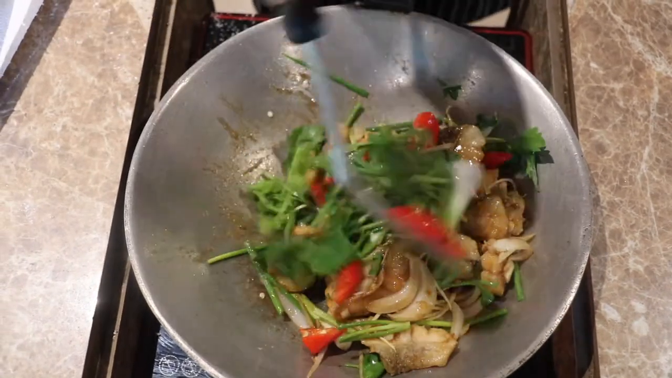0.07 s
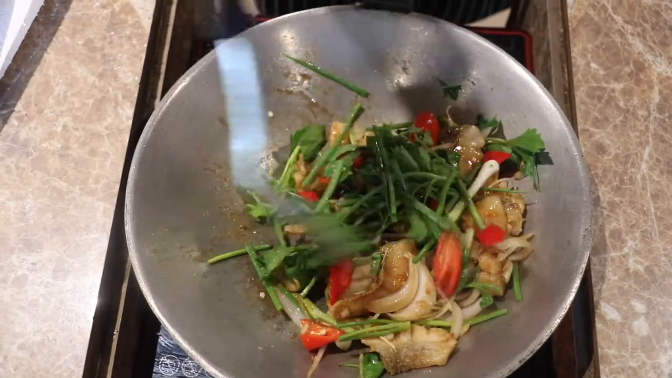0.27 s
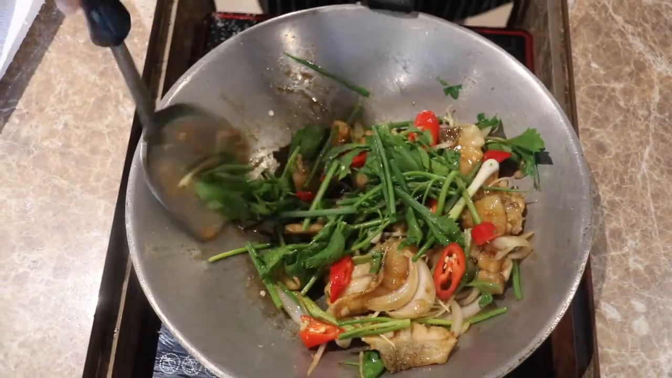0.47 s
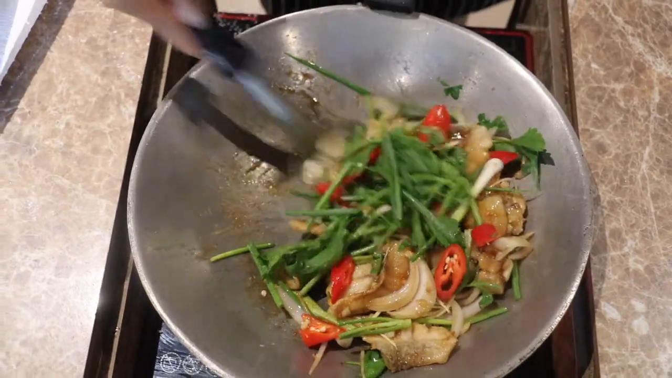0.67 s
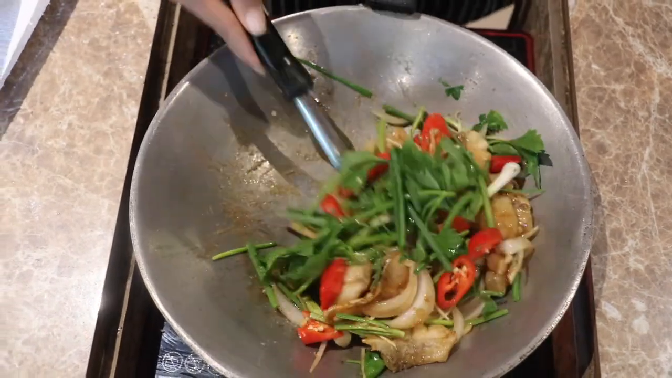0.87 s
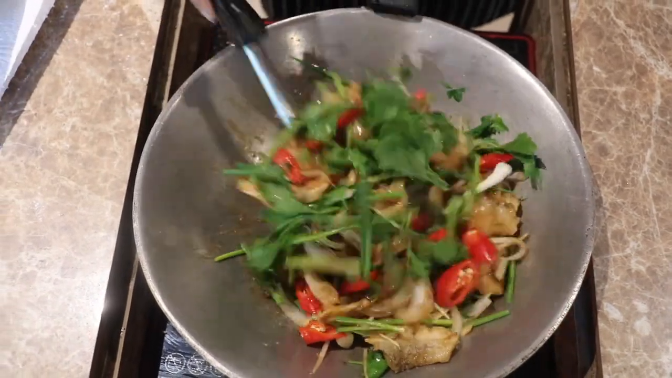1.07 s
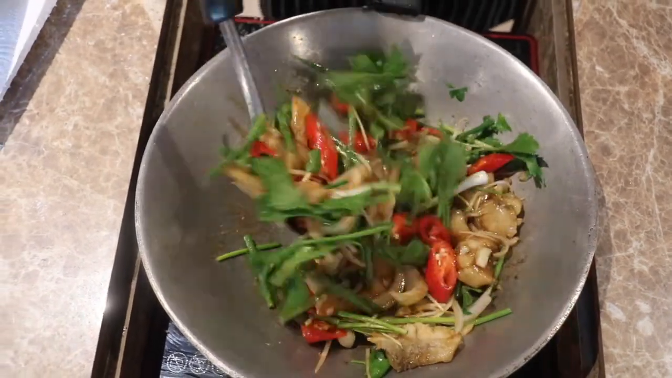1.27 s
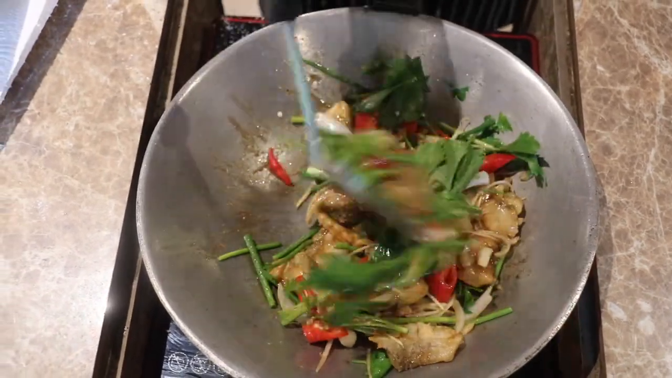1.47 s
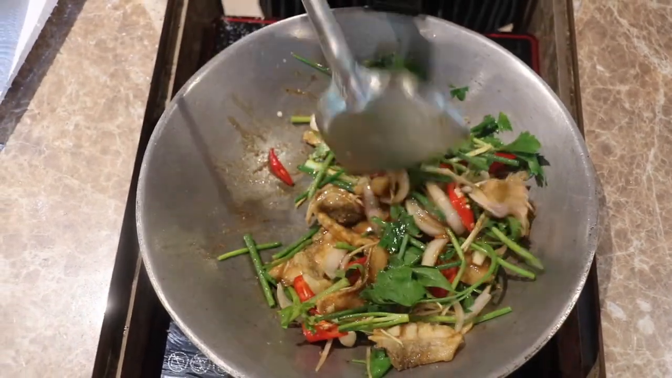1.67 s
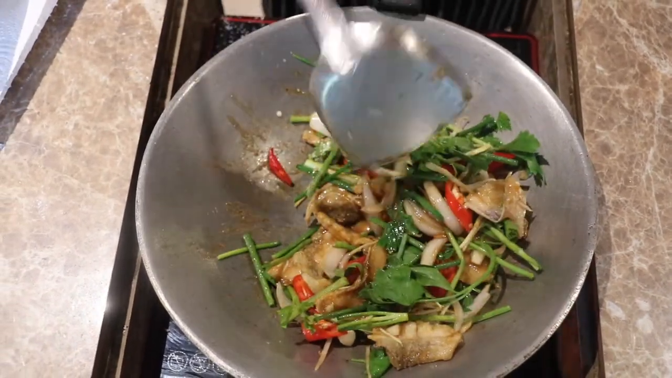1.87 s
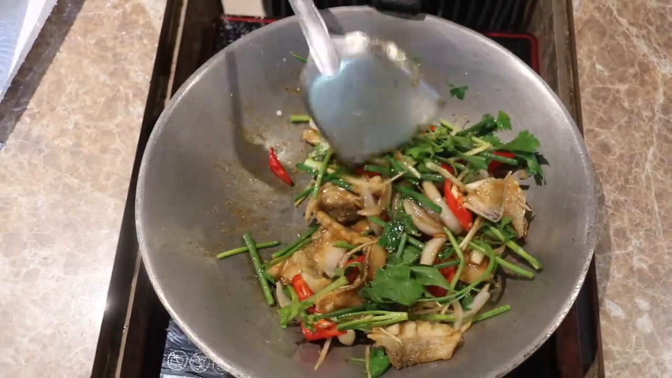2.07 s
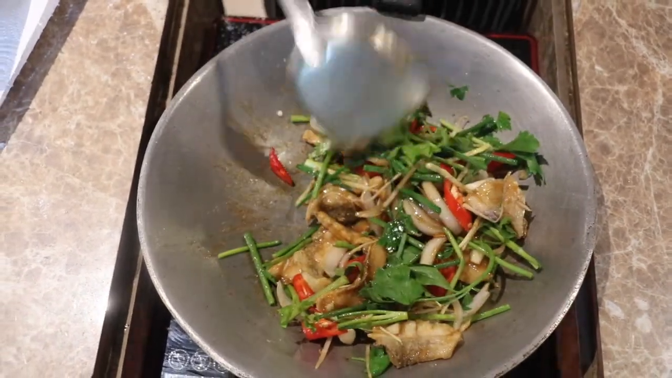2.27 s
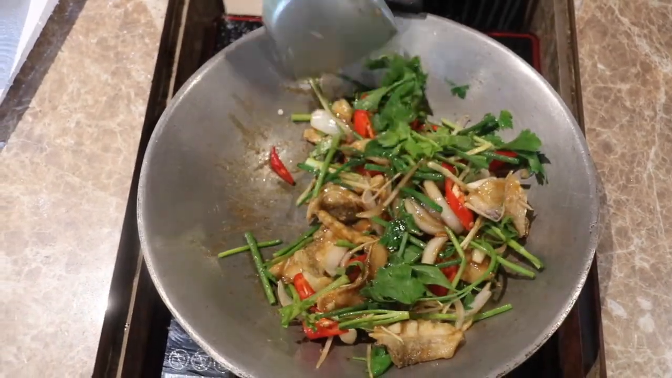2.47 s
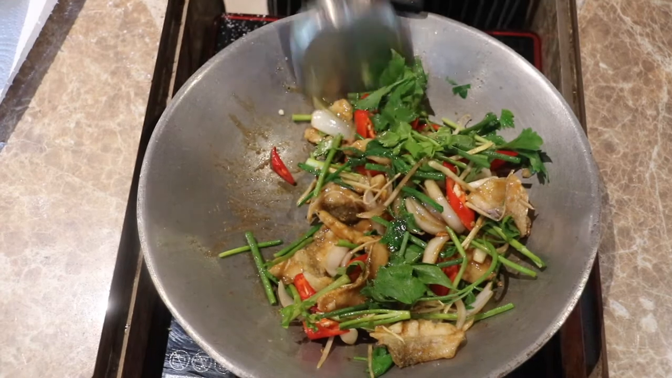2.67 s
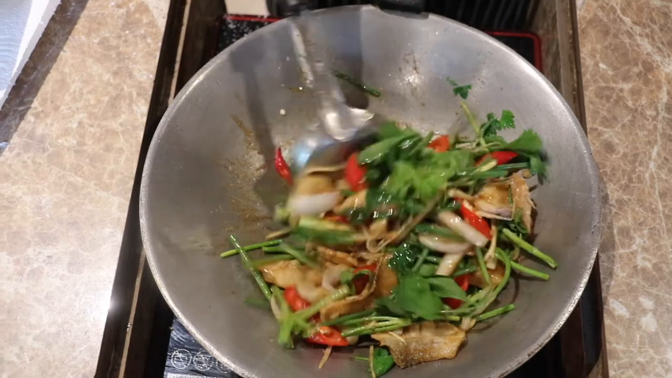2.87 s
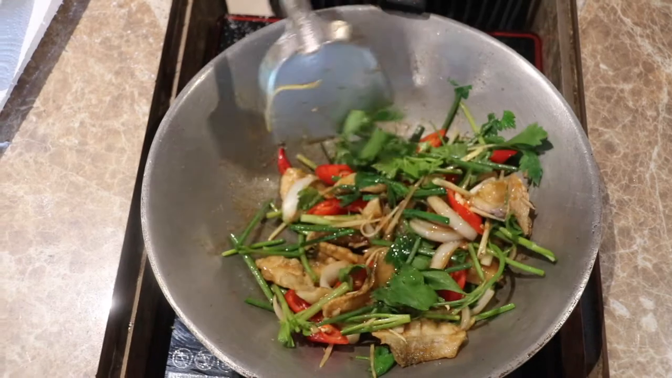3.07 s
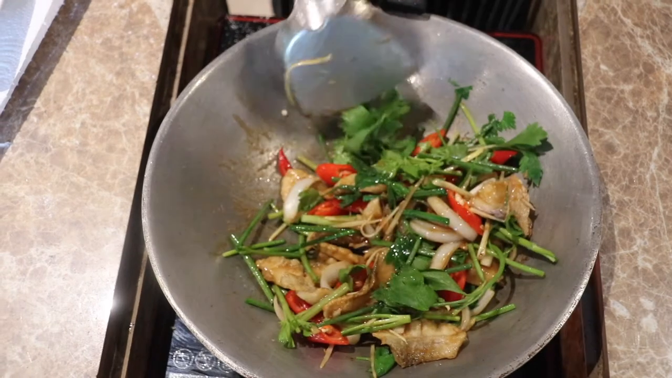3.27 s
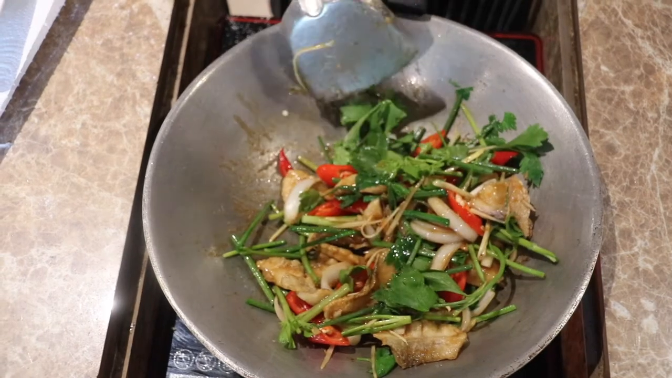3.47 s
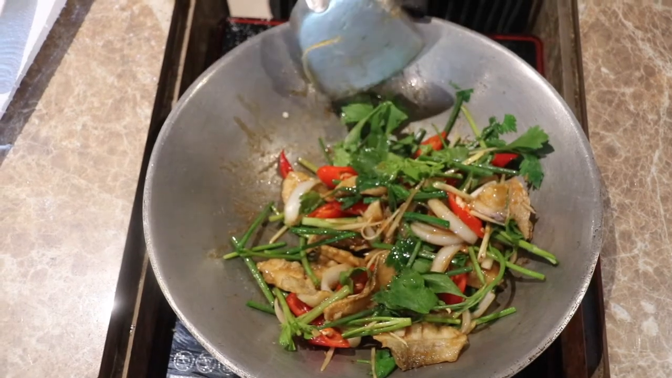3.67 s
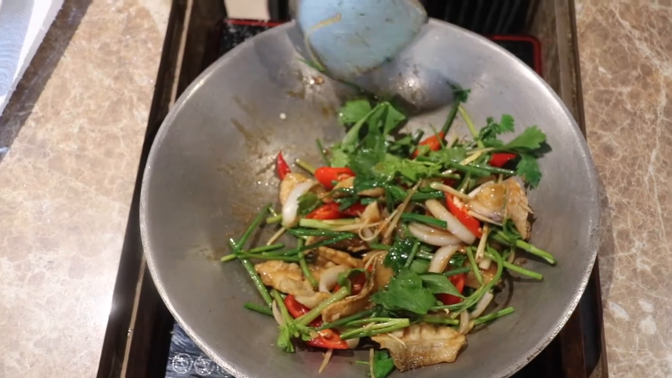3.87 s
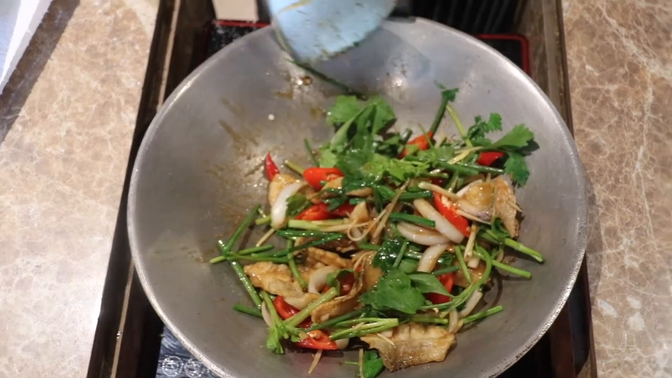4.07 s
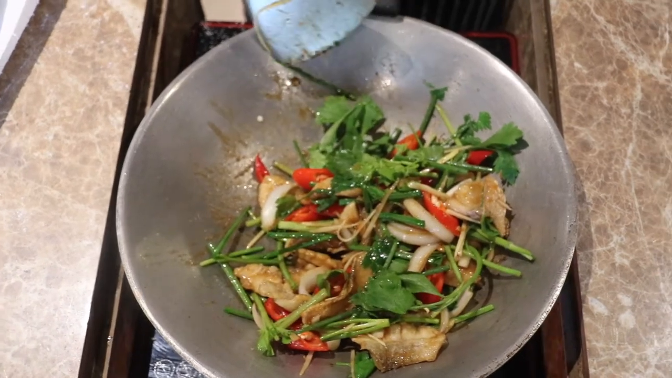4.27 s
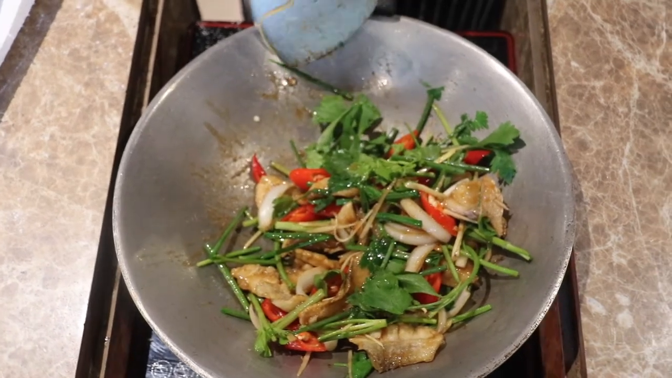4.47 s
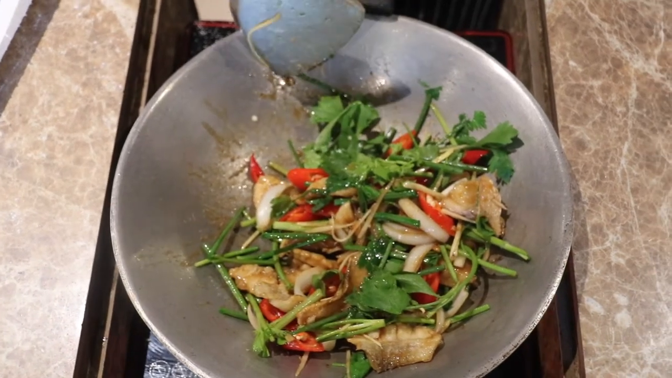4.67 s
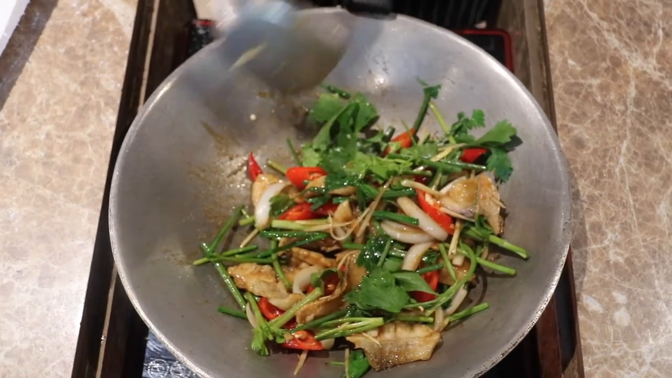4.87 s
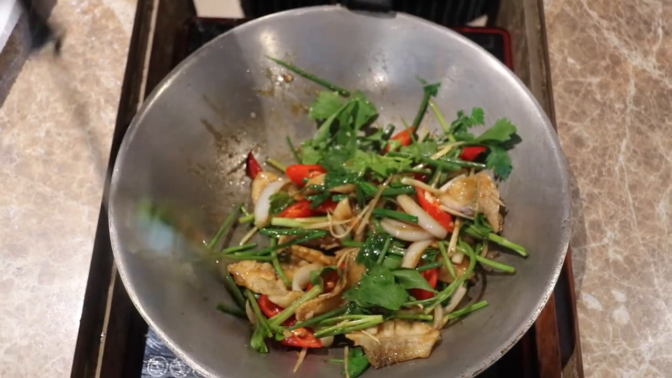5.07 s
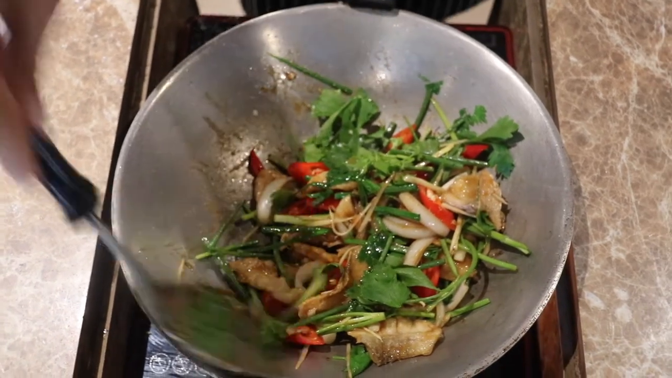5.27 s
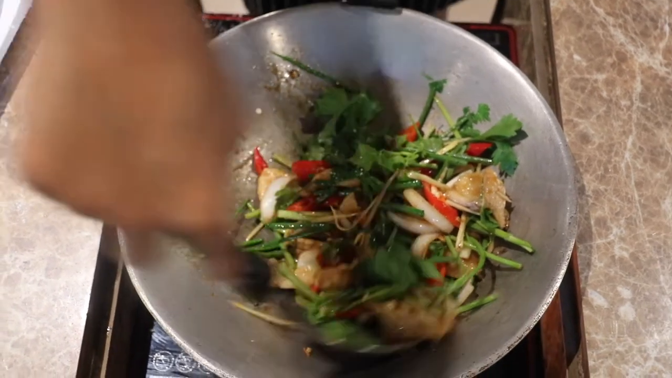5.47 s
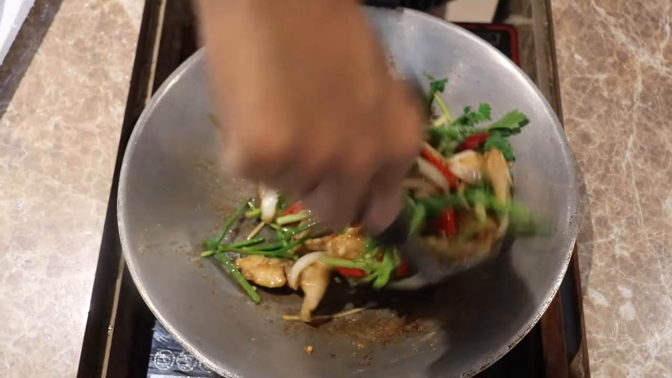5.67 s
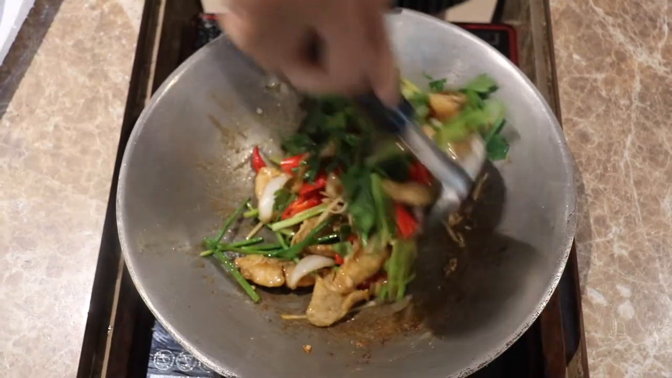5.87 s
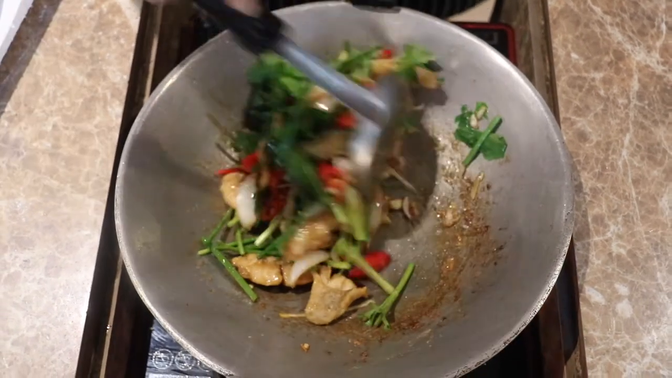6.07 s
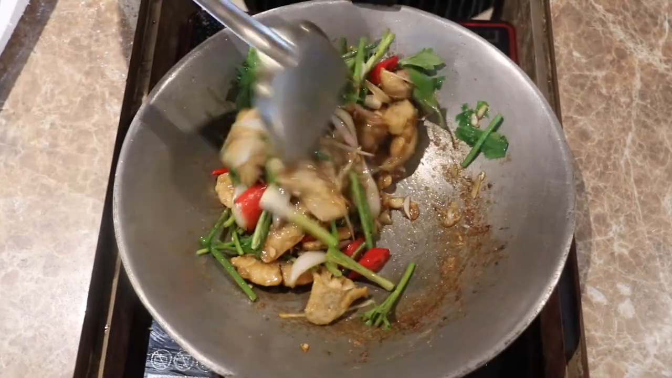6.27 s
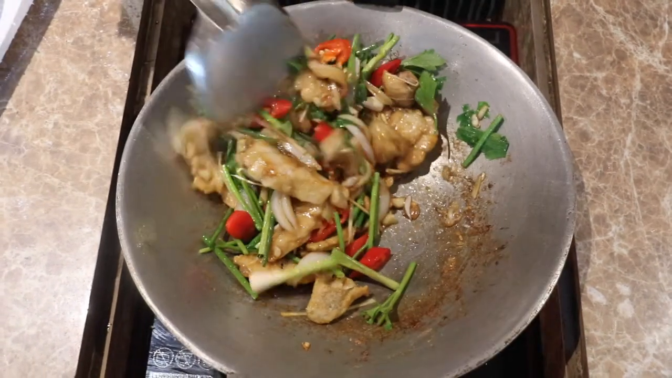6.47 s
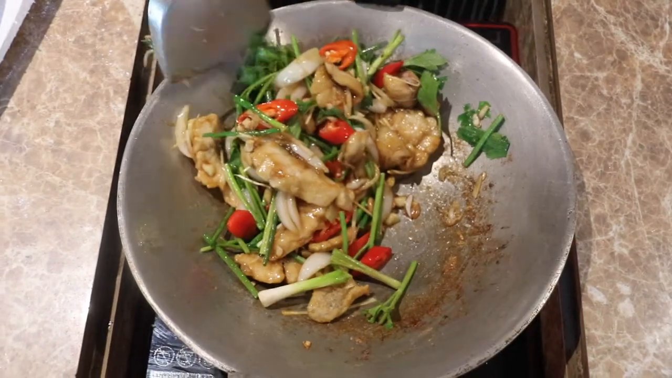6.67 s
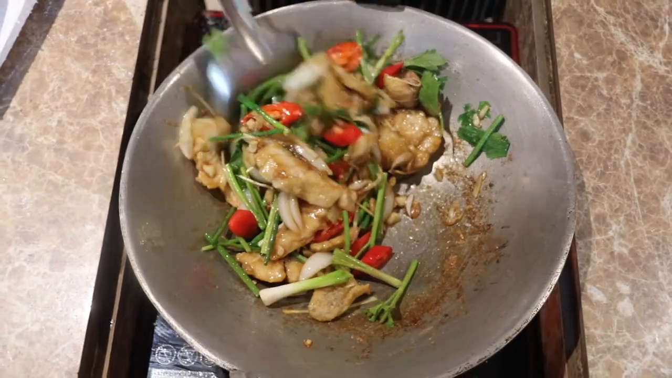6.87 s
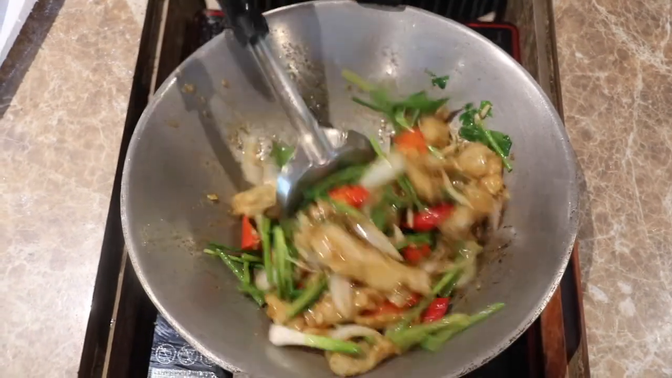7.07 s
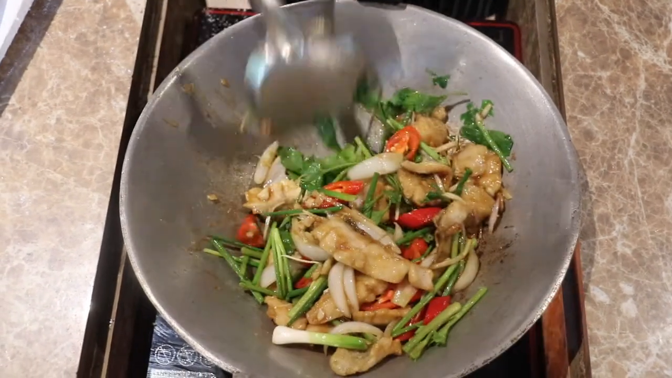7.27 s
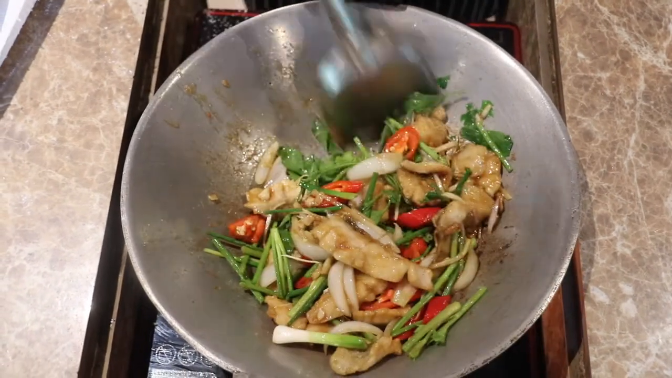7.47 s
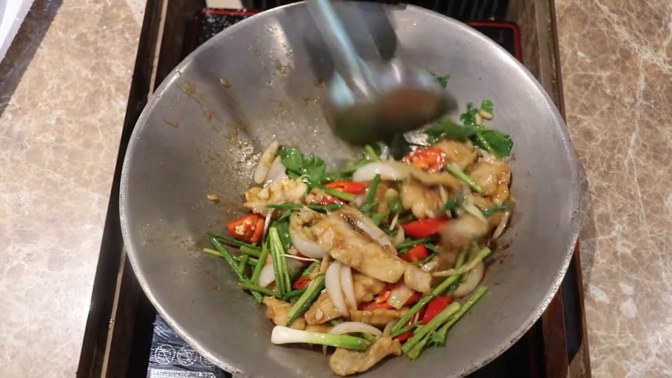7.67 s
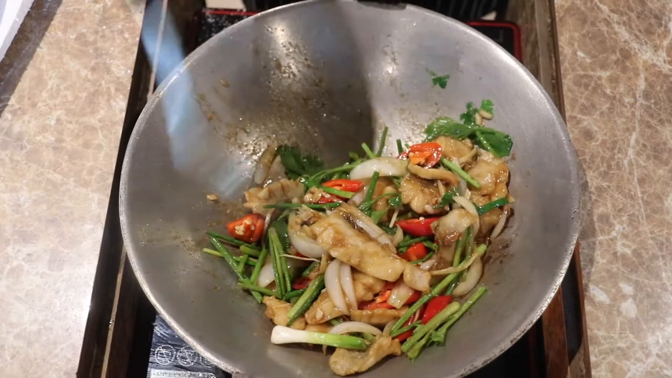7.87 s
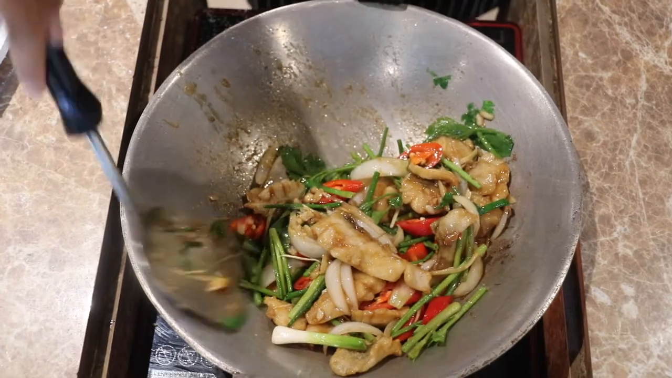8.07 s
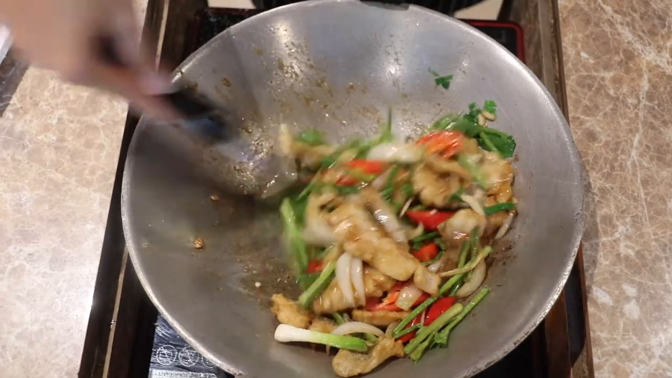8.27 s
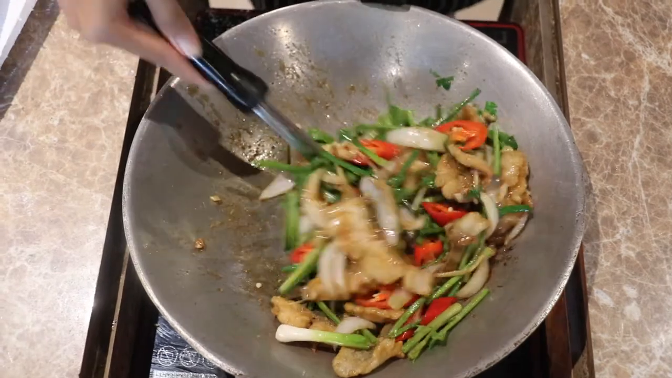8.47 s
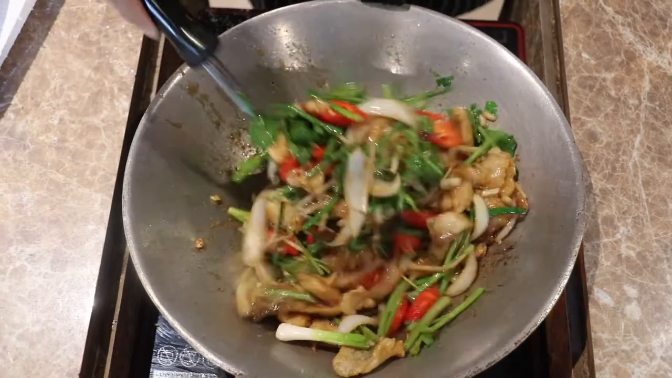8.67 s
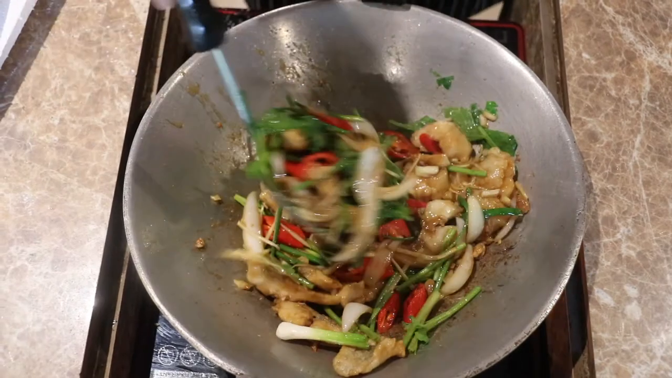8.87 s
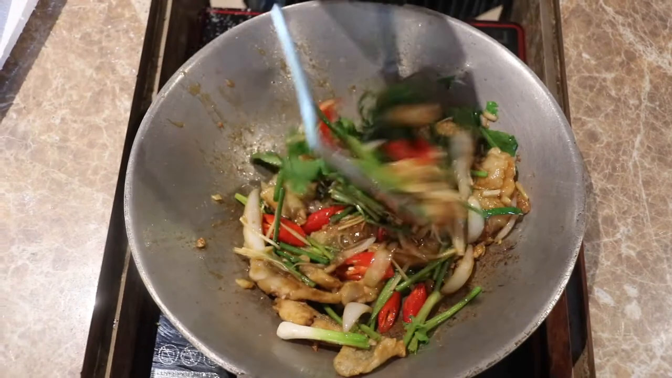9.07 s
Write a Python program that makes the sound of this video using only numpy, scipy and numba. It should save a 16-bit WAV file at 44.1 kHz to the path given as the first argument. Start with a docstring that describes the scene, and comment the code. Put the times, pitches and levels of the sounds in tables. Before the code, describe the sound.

Food sizzles steadily in a steel wok while a metal spatula knocks and scrapes against it, over a low fan hum.

```python
"""Stir-frying in a steel wok.

Steam bubbles burst in four size classes whose pitch shifts as food, spatula and hand move about.
The spatula knocks and scrapes the food-damped bowl; the bowl thuds on its stand.
Behind them a fan hums and the oil hisses. Heard through a phone's single microphone."""
import sys
import numpy as np
from scipy import signal
from scipy.io import wavfile
from scipy.ndimage import uniform_filter1d
from numba import njit

SR = 44100
rng = np.random.default_rng(int(sys.argv[2]) if len(sys.argv) > 2 else 0)


def store_pcm(level_fs):
    """Save levels as 16-bit WAV."""
    pcm = np.round(np.clip(level_fs, -1, 1) * 32767).astype(np.int16)
    wavfile.write(sys.argv[1], SR, np.atleast_2d(pcm).T)


N = 401751

# fan and oil noise spectrum: freq_hz, relative_density_db
NOISE_SPECTRUM = [(40, -33), (70, -20.5), (110, -16.5), (170, -10), (260, -7.5), (400, -7.5), (600, -2.5),
                  (900, -5.5), (1300, -6.5), (2700, -4.5), (6000, -8.5), (10000, -23.5)]
# fan tones: pitch_hz, level_db, width_hz
FAN_TONES = [(75, -75.5, 5), (100.4, -68.5, 4), (451.8, -53.5, 4.8)]
# fan swell, taken about its mean: time_s, level_db
FAN_SWELL = [(0.0, -55), (0.63, -53.5), (1.01, -56.5), (1.52, -48.5), (1.93, -50.5), (2.89, -44),
             (3.2, -51), (3.48, -52.5), (4.31, -45), (5.4, -50.5), (6.04, -56.5), (6.65, -49.5),
             (7.08, -38.5), (7.31, -51), (8.25, -47), (8.57, -55), (9.11, -56)]
# oil hiss swell: time_s, gain_db
OIL_SWELL = [(0, -1.5), (.66, -2), (.695, -3), (.85, 1), (1.3, -0.5), (4.5, 4), (5.7, -2), (7.3, 3.5),
             (9.11, -2)]

# steady boil, one table per bubble size: time_s, level_db, pitch_hz
LARGE_BOIL = [(0, -35.5, 1666), (.55, -39, 1536), (1.1, -36, 1904), (1.24, -37, 1540), (1.4, -33, 1660),
              (1.72, -34.5, 1682), (1.95, -41, 1404), (2.6, -39.5, 1480), (3.25, -47.5, 1464),
              (4.23, -40, 1670), (5.2, -43, 1453), (6.14, -38, 1586), (6.5, -42.5, 1440), (7.36, -36, 1624),
              (7.55, -44.5, 1480), (7.86, -37, 1528), (8.6, -35.5, 1697), (8.68, -40.5, 1490),
              (9.11, -42, 1584)]
MEDIUM_BOIL = [(0, -35.5, 3780), (.6, -36.5, 3880), (.8, -45, 4110), (1.06, -45, 4010), (1.3, -38, 4120),
               (2.0, -36, 3575), (2.74, -31, 3130), (2.86, -35, 3550), (3.3, -34.5, 3397),
               (4.85, -35, 3108), (5.0, -37, 3120), (5.28, -35.5, 4020), (5.6, -44, 4010),
               (5.84, -44, 4100), (6.22, -37.5, 3750), (6.65, -34, 3275), (6.9, -31.5, 2930),
               (7.14, -30, 3860), (7.3, -40.5, 4000), (7.81, -40, 3820), (8.8, -42, 4090),
               (9.11, -38, 4010)]
SMALL_BOIL = [(0, -36.5, 5060), (.6, -39, 4960), (.78, -37, 4750), (.95, -38, 6000), (1.19, -37, 5750),
              (1.44, -32, 4870), (1.75, -38, 4920), (1.93, -44, 4520), (2.75, -42, 6000), (2.9, -52, 4630),
              (3.55, -56, 5430), (4.23, -42, 5210), (5.2, -51, 4820), (5.48, -38.5, 4860),
              (6.11, -39, 4880), (6.5, -64, 5580), (6.8, -42, 5770), (7.1, -43.5, 4710), (7.33, -32, 5250),
              (7.5, -47, 5000), (8.0, -41, 4760), (8.3, -44.5, 4970), (9.11, -44, 4740)]
TINY_BOIL = [(0, -44.5, 8440), (.25, -53, 9060), (.66, -41, 7750), (.76, -61, 7900), (1.13, -61, 7640),
             (1.2, -44, 9500), (1.49, -45.5, 9370), (1.93, -55, 7630), (2.28, -47, 7920),
             (2.74, -47.5, 8200), (2.85, -58.5, 7680), (4.57, -49, 7230), (4.94, -63, 7830),
             (5.6, -52, 7200), (5.79, -66.5, 7200), (6.54, -57, 7330), (7.05, -49.5, 7530),
             (7.26, -51, 8780), (7.43, -37, 7650), (7.68, -49.5, 8340), (7.86, -41.5, 9300),
             (7.96, -38.5, 7900), (8.17, -41, 8220), (8.32, -48, 7600), (8.57, -47, 7500),
             (8.78, -55.5, 8460), (9.11, -51, 8500)]
# borders between sizzle bands, one band per bubble size: pitch_hz
BAND_BORDERS_HZ = [2250, 4290, 6700]
# longer-ringing bubbles, large to tiny: gain_db, log_pitch_spread, decay_cycles
SINGING_BUBBLES = [(-9, .14, 6), (-9, .14, 10), (-5, .06, 15), (-3, .04, 21)]
# brief swells in one sizzle band, frying flare-ups and the noisy rattle of spatula knocks:
# peak_s, level_db, pitch_hz, fade_s
SIZZLE_SWELLS = [(.07, -39, 8930, .05), (.35, -40, 8930, .1), (.46, -36.5, 7900, 0.053),
                 (.56, -35, 7490, .08), (.58, -35, 3800, 0.11), (.66, -35, 4820, 0.074),
                 (.69, -33, 1420, .06), (1.01, -30.5, 2054, .1), (1.17, -32, 6070, .04),
                 (1.29, -40, 9340, .08), (2.81, -35, 1310, .08), (3.019, -32.5, 4010, 0.089),
                 (3.039, -33.5, 1507, 0.17), (3.07, -35, 4950, 0.08), (3.14, -34, 3830, 0.057),
                 (5.35, -33.5, 1150, 0.044), (5.51, -29.5, 1177, .07), (5.66, -31, 1887, 0.19),
                 (5.81, -34.5, 5770, 0.086), (5.94, -39.5, 8900, .08), (6.04, -41.5, 8270, 0.077),
                 (6.93, -32, 1144, 0.033), (7.13, -23.5, 1340, 0.079), (7.15, -36, 8400, 0.056),
                 (7.2, -22.5, 3850, 0.029), (7.2, -21.5, 5080, 0.041), (7.31, -40.5, 9230, 0.063),
                 (7.5, -32.5, 3435, 0.35), (7.61, -36, 4470, .05), (7.74, -31.5, 1255, .08),
                 (7.74, -30, 5340, 0.16), (8.12, -33.5, 4090, 0.27), (8.2, -35, 5360, .1),
                 (8.35, -36.5, 3920, 0.17), (8.42, -33, 1394, .1), (8.6, -35, 5230, .08),
                 (8.7, -37.5, 4800, .06), (8.91, -36.5, 3740, .15)]
# sizzle loudness ducks abruptly and recovers: start_s, depth_db, recovery_s
SIZZLE_DUCKS = [(.688, 8.5, 0.081), (2.775, 4.5, 0.032), (5.38, 0.5, 0.033), (6.945, 11, .04),
                (7.27, 2.5, 0.031)]
# band partly cancelled by the bowl's echo: centre_hz, width_hz, depth_ratio
BOWL_NOTCH = (2210, 103, 0.37)
# echoes off passing blade and hand: start_s, length_s, centre_hz, width_hz, depth_ratio
PASSING_NOTCHES = [(.8, .5, 3300, 1200, .3), (5.25, .8, 3150, 700, .5), (6.2, .8, 5300, 800, .45),
                   (6.3, 1.8, 2200, 250, .4), (7.35, .33, 5600, 600, .6), (7.62, .25, 7400, 1200, .5)]

# blade on bowl: start_s, main_db, upper_db, upper_centre_hz, contact_ms, t60_ratio
BLADE_KNOCKS = [(0.671, -27, -22, 1280, 1.5, 0.74), (0.721, -33, -38, 1340, 1.5, 0.9),
                (0.86, -13.5, -19.5, 930, 2.5, 0.38), (0.889, -43, -28.5, 905, 1.7, 0.97),
                (1.296, -25, -30, 1710, 1.1, 0.41), (2.15, -23, -37, 1630, 1.5, 0.58),
                (2.766, -31, -25, 991, 1.5, 0.97), (2.792, -23, -24, 1010, 1.3, 0.57),
                (2.809, -27, -22, 996, 1.4, 0.71), (2.839, -27, -26, 1160, 1.5, 1),
                (2.863, -23, -35, 1280, 1.2, 0.75), (3.035, -11.5, -18.5, 923, 0.83, 0.65),
                (5.345, -13.5, -15.5, 996, 1.9, 1), (5.357, -14, -20, 1040, 3.7, 1),
                (5.465, -50, -11, 1110, 2.4, 0.63), (5.497, -31, -13, 1130, 3.6, 0.9),
                (5.977, -28, -40, 894, 1.5, 0.68), (5.999, -36, -35, 1730, 1.5, 0.54),
                (6.9166, -14, -7, 973, 1.1, 0.99), (6.924, -10.5, -11, 980, 0.46, 0.48),
                (7.012, -26, -26, 1290, 1, 0.58), (7.24, -26, -28, 958, 1.5, 1),
                (7.283, -14.5, -30, 923, 1.9, 0.33), (7.737, -37, -16.5, 1355, 1.5, 0.73),
                (7.748, -8, -15, 950, 1.6, 0.46), (7.789, -20, -26, 880, 1.4, 0.54),
                (8.121, -24, -28, 1140, 2.3, 0.49), (8.256, -17.5, -34, 1360, 1, 0.52),
                (8.384, -8.5, -8.5, 900, 1.7, 0.3)]
# bowl modes, main and upper: pitch_hz, gain_db, t60_s
BOWL_MAIN_MODES = [(764.7, 8, .16), (725, -14, .1), (809, -0.5, 0.17)]
BOWL_UPPER_MODES = [(891, 3.5, .1), (996, 3, 0.088), (1098, 6.5, 0.036), (1286, -5.5, 0.048),
                    (1710, 12, 0.06)]
# bowl rocking on its stand: start_s, level_db, contact_ms
STAND_THUDS = [(0.651, -20, 4.1), (0.669, -31, 2.5), (0.689, -31.5, 2.2), (0.739, -38, 2.9),
               (0.869, -29, 0.6), (2.791, -30, 3.3), (2.819, -31, 2.9), (3.039, -34, 2), (4.311, -33, 2),
               (4.984, -38, 1.3), (5.339, -16.5, 2.4), (5.982, -39.5, 2.6), (6.475, -45, 2),
               (6.864, -34, 1.3), (6.917, -13.5, 3.2), (6.934, -21, 2), (6.954, -23, 2), (7.02, -26, 2),
               (7.049, -30, 1.5), (7.094, -35, 2), (7.123, -34, 2), (7.165, -27, 2), (7.254, -35, 3.6),
               (7.285, -40, 2), (7.623, -24.5, 2), (7.736, -17.5, 2), (8.192, -22.5, 2),
               (8.392, -26.5, 4.5)]
# modes of the bowl on its stand: pitch_hz, gain_db, t60_s
STAND_MODES = [(150, -22, .05), (249, -4.5, 0.089), (300, 7.5, 0.061), (360.5, 3, 0.1), (461, -5, 0.099)]
# blade sliding on steel: start_s, length_s, first_gain_db, last_gain_db, first_hz, last_hz
BLADE_SCRAPES = [(.43, 0.24, -30, -33, 4000, 3710), (.845, 0.077, -21, -32, 2410, 2280),
                 (.915, .14, -26, -29, 2110, 2010), (1.092, 0.048, -24, -40, 2035, 2030),
                 (.93, 0.29, -35, -36, 6950, 5830), (1.845, 0.076, -25, -33, 3750, 3930),
                 (1.92, .15, -25, -30, 3540, 3410), (2.9, .13, -33, -31, 1050, 1100),
                 (3.01, .09, -34, -34, 4400, 5300), (3.089, .06, -31, -35, 5420, 4380),
                 (5.49, 0.13, -26, -32, 2570, 2380), (5.615, .16, -28, -39, 2050, 1750),
                 (6.22, 0.3, -27, -36, 3580, 3350), (6.74, .2, -31, -32, 2795, 2580),
                 (7.09, .1, -21, -36, 1347, 1294), (7.12, .05, -21.5, -31, 4480, 4700),
                 (7.17, 0.097, -16.5, -33, 4960, 5100), (7.21, .13, -27, -36, 5850, 5700),
                 (7.42, 0.084, -24.5, -35, 3500, 3330), (7.77, 0.13, -27, -32, 5840, 5680),
                 (8.02, 0.16, -32, -36, 3750, 3900), (8.22, 0.15, -32, -24.5, 3840, 3980)]
# brief rings of the blade edge: start_s, level_db, pitch_hz
EDGE_RINGS = [(2.7626, -23, 4350), (2.8044, -25, 4290), (2.835, -30, 4260), (3.0042, -23, 3920)]
# blade edge modes: pitch_ratio, gain_db, t60_s
EDGE_MODES = [(.6, -9, .04), (1, 2, 0.072), (1.49, -4, .04)]


def undb(db):
    return 10 ** (np.asarray(db) / 20)


def at_rms(x, db):
    return x * undb(db) / np.sqrt(np.mean(x ** 2))


def curve(table):
    """(time_s, value) rows, interpolated per sample."""
    return np.interp(np.arange(N) / SR, *np.transpose(table))


def band(x, hz, width_hz):
    """One resonance, unity gain at centre."""
    return signal.lfilter(*signal.iirpeak(hz, hz / width_hz, SR), x)


def walk(rate_hz):
    """Smoothed random steps, spread near 1."""
    hold = int(SR / rate_hz)
    steps = np.repeat(rng.standard_normal(N // hold + 1), hold)
    return 1.21 * uniform_filter1d(uniform_filter1d(steps, hold), hold)[:N]


@njit
def grains(starts, hz, cycles, gain):
    """Sines that swell and die, time constant in cycles."""
    out = np.zeros(N)
    for g in range(len(starts)):
        pole = np.exp((2j * np.pi - 1 / cycles[g]) * hz[g] / SR)
        step = hz[g] / SR / cycles[g]
        phasor = gain[g] + 0j
        for i in range(min(N - starts[g], int(7 / step))):
            out[starts[g] + i] += phasor.imag * i * step
            phasor *= pole
    return out


def bursts(track, per_s, spread, cycles, scatter_db, flicker_db, drift, flicker_hz=18):
    """Random grains along (time_s, level_db, pitch_hz) rows; spread and drift in log pitch."""
    time_s, db, hz = np.transpose(track)
    first, last = int(time_s[0] * SR), min(int(time_s[-1] * SR), N)
    starts = rng.integers(first, last, per_s * (last - first) // SR)
    db, hz = np.interp(starts / SR, time_s, db), np.interp(starts / SR, time_s, hz)
    pitch_draw, decay_draw = rng.standard_normal((len(starts), 2)).T
    strength = np.minimum(rng.exponential(size=len(starts)), 3)
    gain = undb(scatter_db * strength + flicker_db * walk(flicker_hz)[starts])
    pitch_hz = np.clip(hz * np.exp(drift * walk(20)[starts] + spread * pitch_draw), 300, .4 * SR)
    decay_cycles = cycles * np.exp(.49 * decay_draw)
    mean_square = per_s * np.mean(gain ** 2 * decay_cycles / pitch_hz) / 8
    return grains(starts, pitch_hz, decay_cycles, undb(db) * gain / np.sqrt(mean_square))


def strike(blows, modes, detune):
    """Damped modes, slightly different at each blow; contact time sets the attack."""
    out, t = np.zeros(N + SR), np.arange(SR // 4) / SR
    for start_s, peak_db, contact_ms, t60_ratio in blows:
        ring = 0
        for hz, db, t60_s in modes:
            gain_draw, pitch_draw, phase_draw = rng.standard_normal(3)
            envelope = undb(db + 2 * gain_draw - 60 * t / (t60_s * t60_ratio))
            ring += envelope * np.sin(2 * np.pi * hz * (1 + detune * pitch_draw) * t + .58 * phase_draw)
        ring *= 1 - np.exp(-t * 1000 / contact_ms)
        i = int(start_s * SR)
        out[i:i + len(t)] += undb(peak_db) * ring / np.abs(ring).max()
    return out[:N]


def fan_and_oil():
    """Flickering half-octave noise bands: lows and hum follow the fan, highs the oil."""
    fan_db, oil_db = curve(FAN_SWELL), curve(OIL_SWELL)
    fan_db -= fan_db.mean()
    freq_hz, density_db = np.transpose(NOISE_SPECTRUM)
    noise = 0
    for hz in 45 * 2 ** np.arange(0, 8, .5):
        band_db = np.interp(np.log(hz), np.log(freq_hz), density_db) + 10 * np.log10(hz)
        swell_db = 1.2 * walk(6) + (fan_db if hz < 700 else oil_db)
        rush = band(band(rng.standard_normal(N), hz, hz / 2), hz, hz / 2)
        noise += undb(band_db + swell_db) * at_rms(rush, 0)
    hum = sum(at_rms(band(rng.standard_normal(N), hz, width_hz), db) for hz, db, width_hz in FAN_TONES)
    return at_rms(noise, -37.5) + undb(.5 * fan_db) * hum


def sizzle_track(steady, band_index, fade_db=13, rise_ratio=.8):
    """Level and pitch of one sizzle band: swells add power and pull the pitch, ducks lower the gain."""
    t = np.arange(0, N / SR + .005, .005)
    time_s, steady_db, steady_hz = np.transpose(steady)
    power = undb(2 * np.interp(t, time_s, steady_db))
    weighted_hz = power * np.interp(t, time_s, steady_hz)
    for peak_s, db, hz, fade_s in SIZZLE_SWELLS:
        if np.searchsorted(BAND_BORDERS_HZ, hz) == band_index:
            slope_s = fade_s * np.where(t < peak_s, rise_ratio, 1)
            swell = undb(2 * (db - fade_db * abs(t - peak_s) / slope_s))
            power += swell
            weighted_hz += swell * hz
    duck_db = sum(depth_db * (t >= start_s) * np.exp(-abs(t - start_s) / recovery_s)
                  for start_s, depth_db, recovery_s in SIZZLE_DUCKS)
    return np.transpose([t, 10 * np.log10(power) - duck_db, weighted_hz / power])


def sizzle():
    """Steam bubbles burst in four sizes, the smaller the higher; a few of each ring longer."""
    boils = LARGE_BOIL, MEDIUM_BOIL, SMALL_BOIL, TINY_BOIL
    tracks = [sizzle_track(steady, band_index) for band_index, steady in enumerate(boils)]
    large, medium, small, tiny = tracks
    out = bursts(large, per_s=3000, spread=.1903, cycles=1.75, scatter_db=1.5, flicker_db=.9, drift=.023)
    out += bursts(medium, per_s=5000, spread=.1974, cycles=3.3, scatter_db=2, flicker_db=.9, drift=.018)
    out += bursts(small, per_s=6000, spread=.122, cycles=4.3, scatter_db=3, flicker_db=-.1, drift=.025)
    out += bursts(tiny, per_s=5000, spread=.0875, cycles=6.3, scatter_db=6.5, flicker_db=2.5, drift=.02)
    for track, (db, spread, cycles) in zip(tracks, SINGING_BUBBLES):
        out += undb(db) * bursts(track, per_s=400, spread=spread, cycles=cycles,
                                 scatter_db=4, flicker_db=3, drift=.0154)
    return out


def echo_notches(x):
    """Echoes partly cancel bands: steadily off the bowl, briefly off blade and hand."""
    hz, width_hz, depth = BOWL_NOTCH
    x = x - depth * band(x, hz, width_hz)
    for start_s, length_s, hz, width_hz, depth in PASSING_NOTCHES:
        passing = np.sin(np.pi * np.clip((np.arange(N) / SR - start_s) / length_s, 0, 1))
        x = x - depth * passing * band(x, hz, width_hz)
    return x


def bowl_knocks(falloff_db_per_octave=83):
    """The blade rings the bowl; the spot struck favours upper modes near one pitch."""
    blows = [(start_s, db, ms, t60_ratio) for start_s, db, _, _, ms, t60_ratio in BLADE_KNOCKS]
    out = strike(blows, BOWL_MAIN_MODES, detune=.0077)
    for start_s, _, upper_db, centre_hz, contact_ms, t60_ratio in BLADE_KNOCKS:
        modes = [(hz, db - falloff_db_per_octave * abs(np.log2(hz / centre_hz)), t60_s)
                 for hz, db, t60_s in BOWL_UPPER_MODES]
        out += strike([(start_s, upper_db, contact_ms, t60_ratio)], modes, detune=.015)
    return out


def stand_thuds():
    """The rocking bowl hits its stand and rings low modes."""
    return strike([(*thud, 1) for thud in STAND_THUDS], STAND_MODES, detune=.043)


def blade_scrapes(bite_s=.022, touch_db=-9):
    """Stick-slip squeaks: the edge touches lightly, bites, then slides."""
    out = 0
    for start_s, length_s, first_db, last_db, first_hz, last_hz in BLADE_SCRAPES:
        track = [(start_s, first_db + touch_db, first_hz),
                 (start_s + bite_s, first_db, first_hz),
                 (start_s + length_s, last_db, last_hz)]
        out += bursts(track, per_s=700, spread=.045, cycles=8,
                      scatter_db=3.5, flicker_db=4, drift=.02, flicker_hz=45)
    return undb(-4.5) * out


def edge_rings(contact_ms=3):
    """The blade edge rings briefly in its own inharmonic modes."""
    out = 0
    for start_s, peak_db, hz in EDGE_RINGS:
        modes = [(ratio * hz, db, t60_s) for ratio, db, t60_s in EDGE_MODES]
        out += strike([(start_s, peak_db, contact_ms, 1)], modes, detune=.0028)
    return out


def scene():
    """Frying, fan and spatula; one microphone feeds both channels."""
    frying = echo_notches(sizzle() + fan_and_oil())
    spatula = bowl_knocks() + stand_thuds() + blade_scrapes() + edge_rings()
    return np.tile(frying + spatula, (2, 1))


def record(dry):
    """The phone drops deep bass, rounds the loudest knocks and cuts the top."""
    low_hz, top_hz, ceiling = 75, 10050, .62
    thin = signal.sosfilt(signal.butter(2, low_hz, "high", fs=SR, output="sos"), dry)
    rounded = ceiling * np.tanh(thin / ceiling)
    return signal.sosfilt(signal.ellip(12, .2, 70, top_hz, fs=SR, output="sos"), rounded)


dry = scene()
out = record(dry)
store_pcm(out)
```